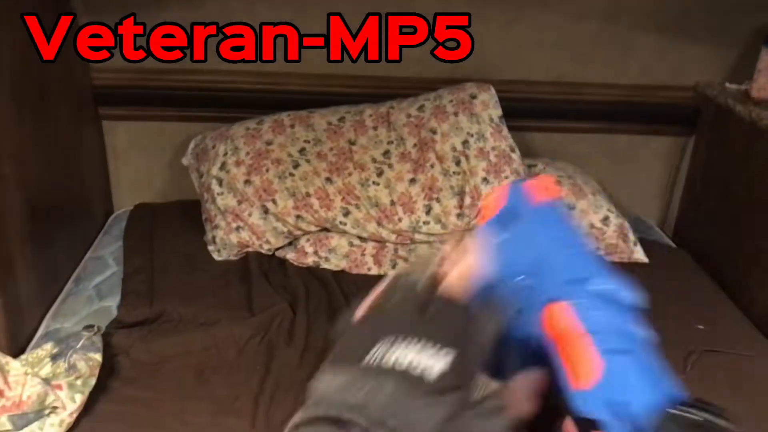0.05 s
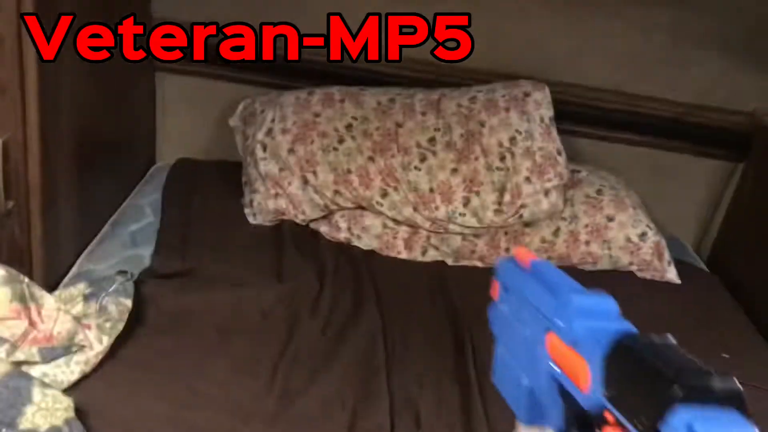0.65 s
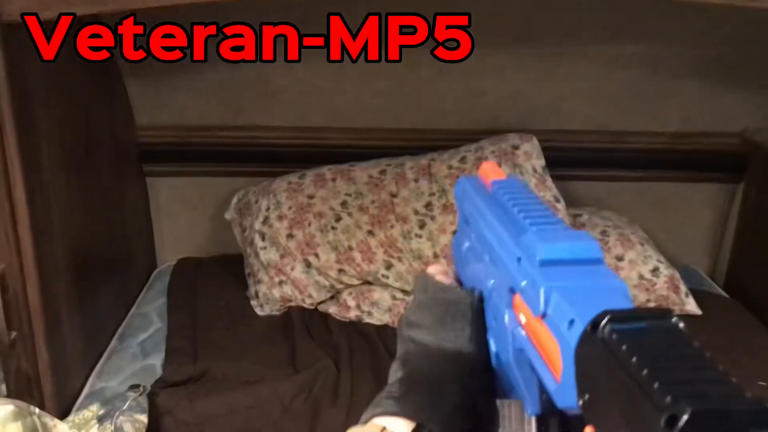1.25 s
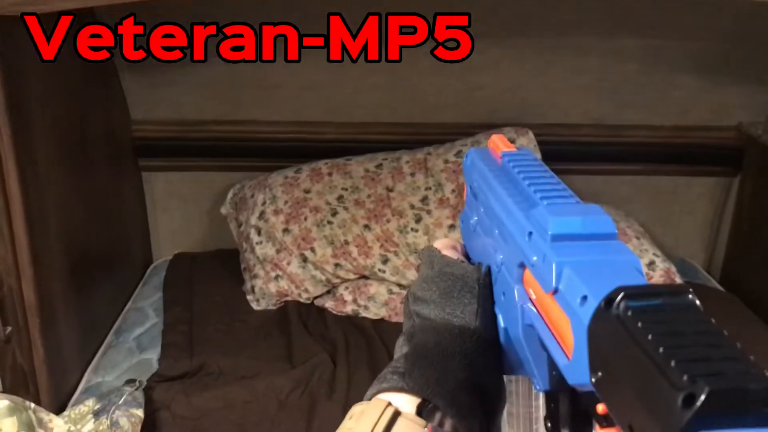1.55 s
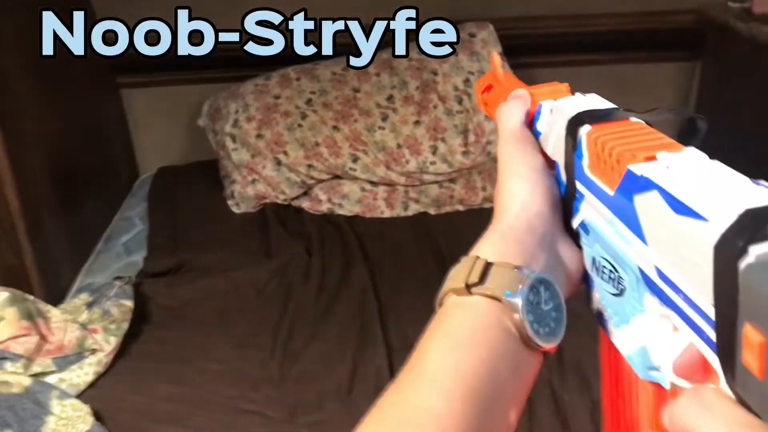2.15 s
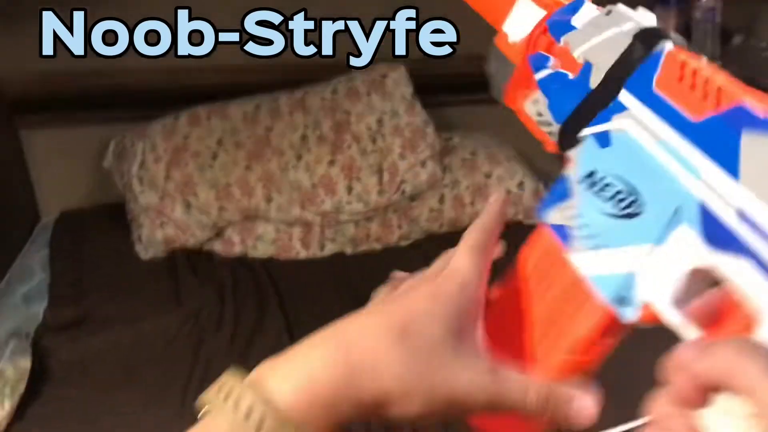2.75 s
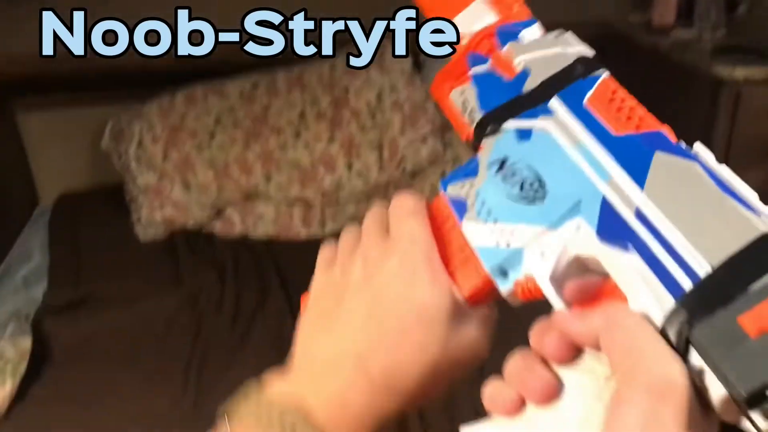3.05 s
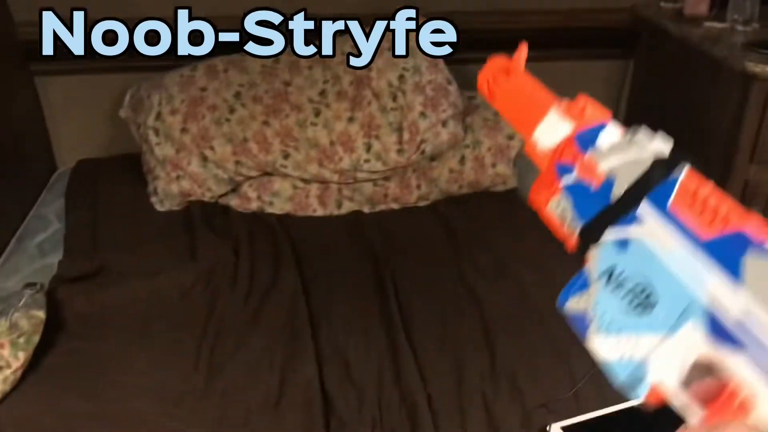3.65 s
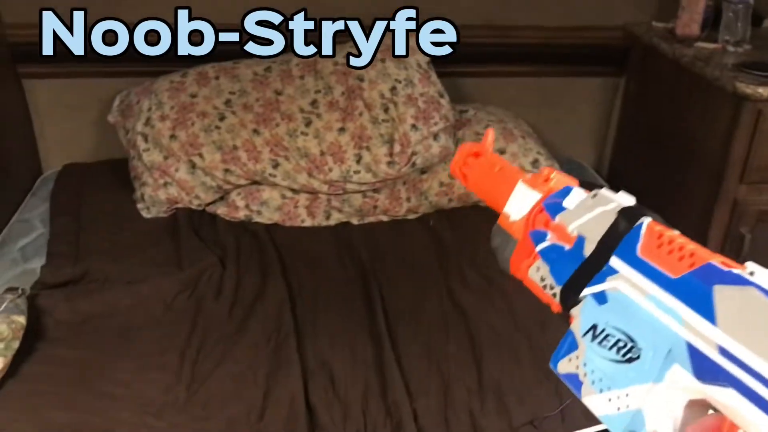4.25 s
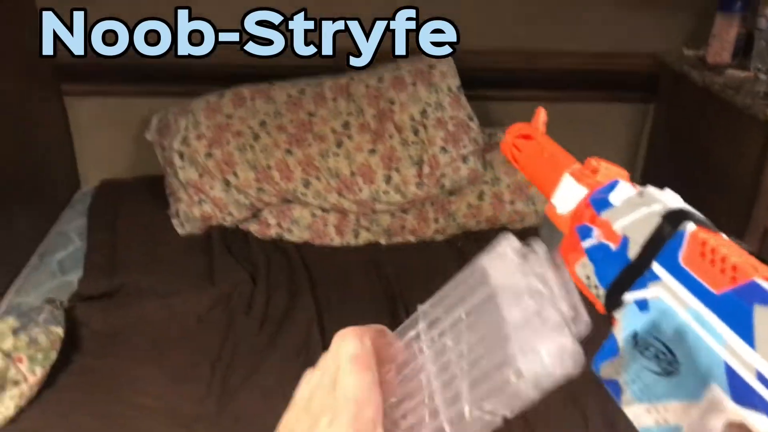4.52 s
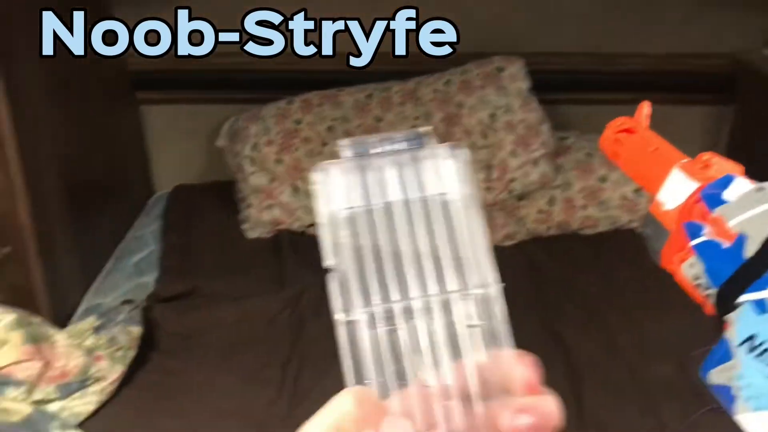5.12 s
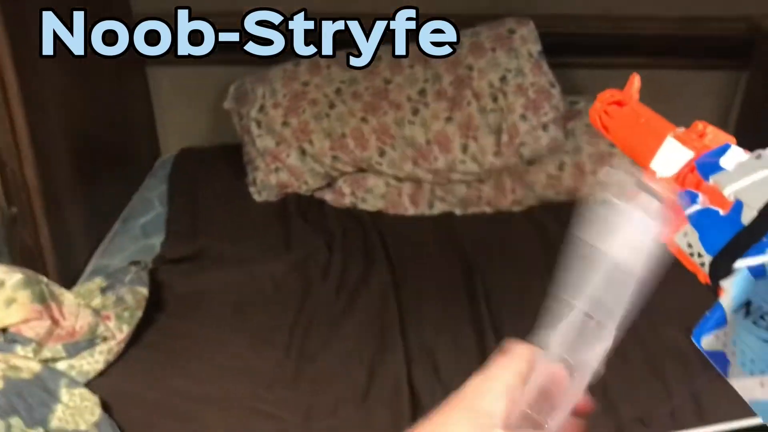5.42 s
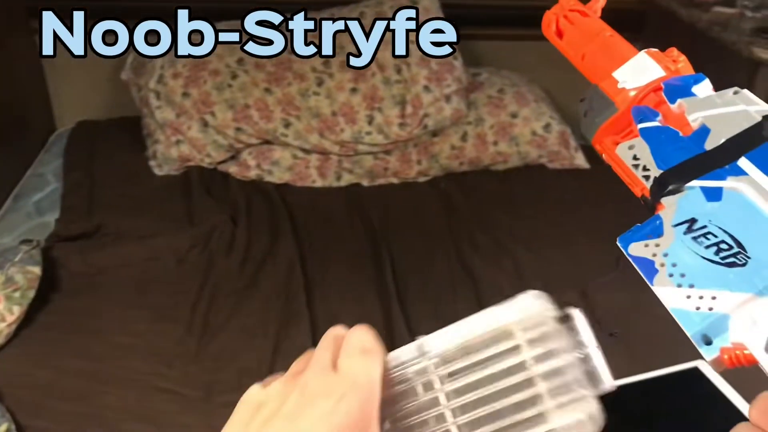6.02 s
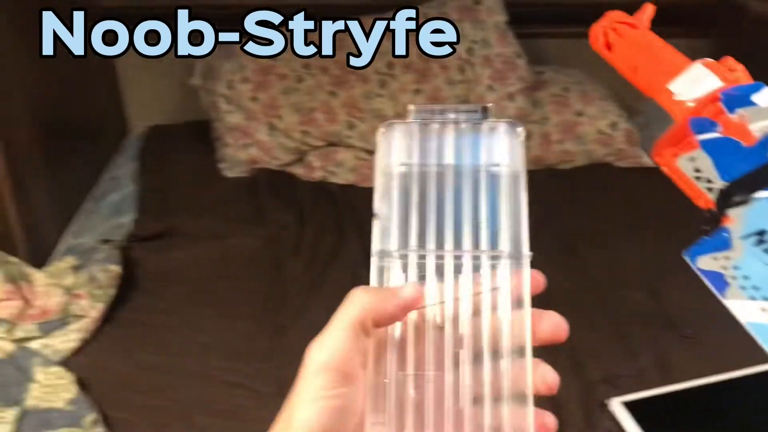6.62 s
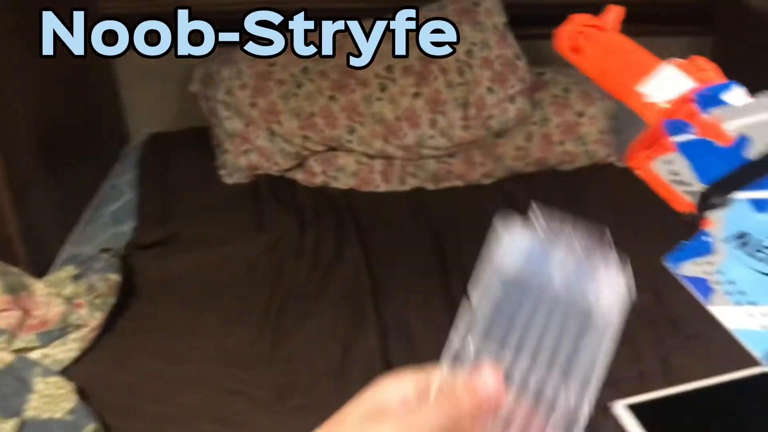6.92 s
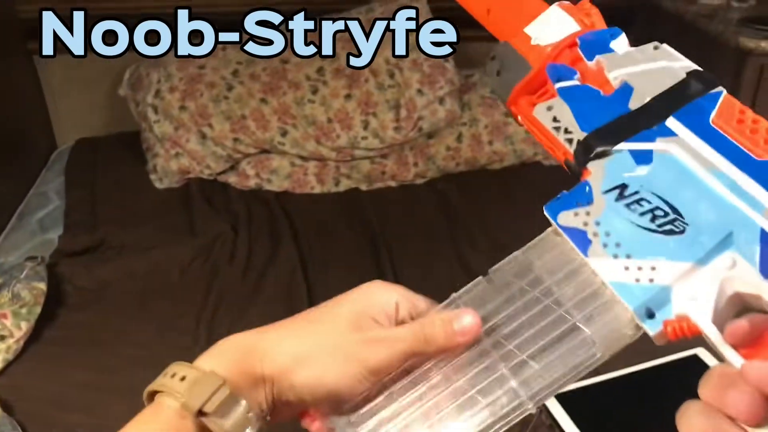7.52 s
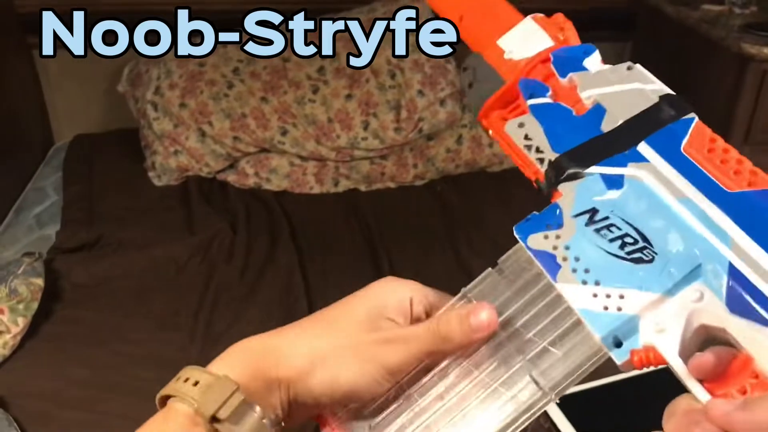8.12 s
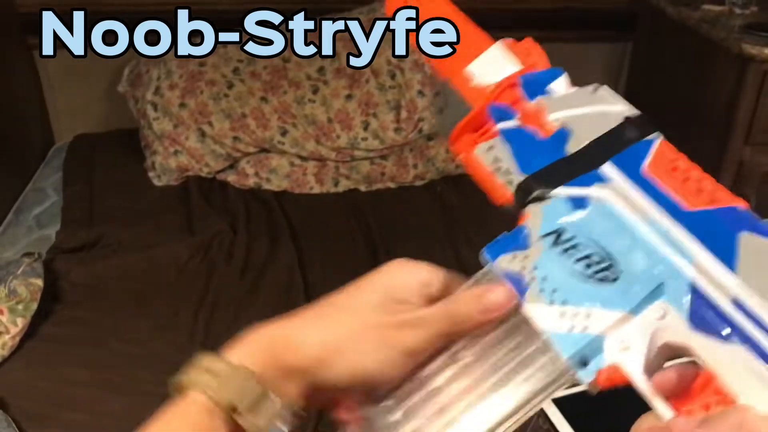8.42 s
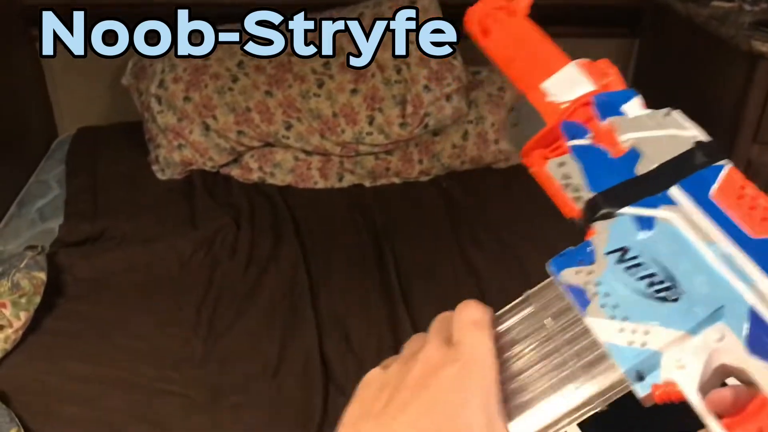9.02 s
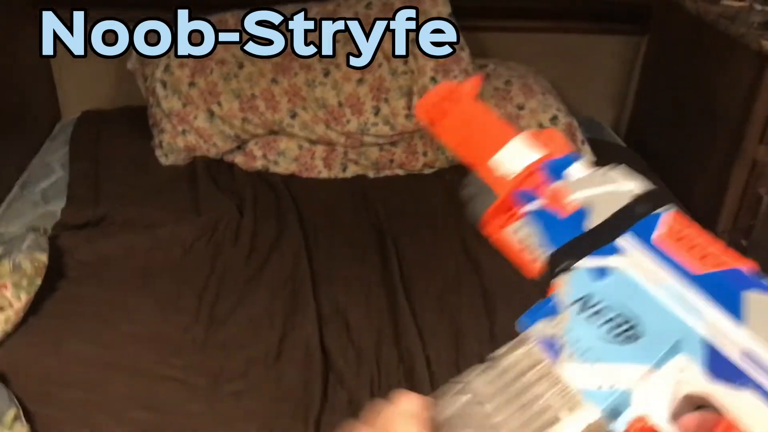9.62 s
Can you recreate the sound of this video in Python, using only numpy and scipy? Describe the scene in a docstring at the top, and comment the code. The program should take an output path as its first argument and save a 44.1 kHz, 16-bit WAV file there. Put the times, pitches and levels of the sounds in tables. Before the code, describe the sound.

A low fan hum runs throughout in a small bedroom, with all the handling close by. A sleeve swishes over plastic during the first second, and a toy blaster's latch snaps sharply at about 0.3 seconds. A few faint ticks follow, then a lull. From 2.5 seconds hands rub and tap the hollow shell, and a magazine is pulled out with clacks at 3.1 and 3.3 seconds. At 3.6 seconds its spring jolts home with a loud snap and a short buzz, settling in faint tinkles until 4.5 seconds. Another magazine is turned over with soft taps, rattles and rubbing. From 7.1 to 8.4 seconds it knocks against the blaster in a run of hard, hollow clacks with scraping between them. One more click comes at 9 seconds, and a last cluster of clacks and rubbing around 9.6 seconds pushes it home.

```python
"""Plastic toy blasters are reloaded close by in a small bedroom, over the low hum of a fan.
A sleeve swishes, a latch snaps and loose parts tick; hands rub on the shells between the impacts.
After three seconds a magazine is pulled out, and its spring jolts home, buzzes and settles in tinkles.
Another is turned over with light taps and, from seven seconds, knocked against the well and pushed home.
Each impact rings the resonances of hollow plastic; friction excites them as a train of tiny slips."""
import sys
import numpy as np
from scipy import signal
from scipy.fft import rfft, irfft, next_fast_len
from scipy.io import wavfile
from scipy.ndimage import uniform_filter1d

SR = 44100
rng = np.random.default_rng(int(sys.argv[2]) if len(sys.argv) > 2 else 0)


def int16_out(signal):
    """Quantize to a 16-bit WAV file."""
    q = np.round(np.clip(np.atleast_2d(signal).T, -1, 1) * 32767)
    wavfile.write(sys.argv[1], SR, q.astype(np.int16))


N = 430857

# resonances of the blaster's hollow shell: pitch_hz, width_hz, lift_db
SHELL_MODES = [(340, 21, 1), (508, 27, 6.5), (634.4, 50, 6.5), (815, 94, 7.5), (899, 41, 5),
               (1074, 50, 7.5), (1265, 90, 5), (1393, 140, 5.5), (1828, 53, 5.5), (2010, 41, 4),
               (2445, 65, 4), (2595, 63, 4), (3450, 250, 2), (4100, 310, 5), (4580, 97, 4),
               (5460, 180, 6.5), (6020, 150, 4), (6730, 77, 4.5), (8850, 300, 1.5)]


def amp(db):
    return 10 ** (np.asarray(db) / 20)


def unit(x):
    return x / np.sqrt(np.mean(x ** 2) + 1e-20)


def along(points, hz):
    """Interpolation of (frequency_hz, value) points on a logarithmic frequency axis."""
    f, v = np.transpose(points)
    return np.interp(np.log(hz + 1), np.log(f + 1), v)


def body(spectrum, modes=(), size=2048):
    """Minimum-phase impulse response of a broad spectrum with resonance peaks on it."""
    hz = np.fft.rfftfreq(size, 1 / SR)
    peaks_db = sum(lift / (1 + (2 * (hz - f) / width) ** 2) for f, width, lift in modes)
    cepstrum = irfft(np.log(amp(along(spectrum, hz) + peaks_db)))
    cepstrum[1:size // 2] *= 2
    cepstrum[size // 2 + 1:] = 0
    return irfft(np.exp(rfft(cepstrum)))


def through(x, response):
    """Convolution: the output of a linear system driven by x."""
    return signal.fftconvolve(x, response)[:len(x)]


def filtered(x, gain):
    """Zero-phase filtering by a gain that depends on frequency."""
    size = next_fast_len(N + SR // 4)
    return irfft(rfft(x, size) * gain(np.fft.rfftfreq(size, 1 / SR)), size)[:N]


def grains(per_s, spread_db, smooth):
    """Shot noise: tiny slips of random time and size, on a smooth hiss."""
    impulses = (rng.random(N) < per_s / SR) * rng.choice([-1, 1], N)
    sizes = amp(spread_db * rng.standard_normal(N).clip(-2, 2))
    return unit(impulses * sizes) + smooth * rng.standard_normal(N)


def strokes(table, rise_share=0.45, end_drop_db=18.5):
    """Friction noise follows sliding speed: each stroke's gain swells and fades; overlaps add in power."""
    t, power = np.arange(N) / SR, np.zeros(N)
    for peak_s, db, length_s in table:
        near = np.abs(t - peak_s) < 2 * length_s
        offset_s = t[near] - peak_s
        away = np.maximum(-offset_s / rise_share, offset_s / (1 - rise_share)) / length_s
        power[near] += amp(db - end_drop_db * away ** 2) ** 2
    return np.sqrt(power)


def room_tail():
    """Reverberation: the bedroom's diffuse field builds up, then decays at a rate set by frequency."""
    # decay times of the room: frequency_hz, t60_s
    decay_times = [(150, .3), (600, 0.21), (2000, 0.17), (6000, 0.23), (15000, 0.19)]
    hz, t, noise = signal.stft(rng.standard_normal(SR // 4), SR, nperseg=256)
    decay = amp(-60 * t / along(decay_times, hz)[:, None])
    build_up = np.clip(t / 0.01, 0, 1)
    tail = signal.istft(noise * decay * build_up, SR, nperseg=256)[1]
    return tail / np.linalg.norm(tail)


def impacts(hits, modes, gains_db, ring_t60_s, crack_t60_s, chatter_db, room_db, uneven, detune):
    """Impact excitation: a short crack, then the damped ring of thin walls, in four bands."""
    # spectra of the bands, from hollow knock to edge snap: frequency_hz, density_db
    knock = [(60, -43), (150, -18), (255, -16), (335, -1.5), (480, -3), (590, -6.5), (720, -18.5),
             (1500, -46.5)]
    wall = [(300, -35.5), (500, -18.5), (700, -1.5), (1200, -2.5), (1500, -1), (1900, -7), (3000, -29.5),
            (6000, -63.5)]
    click = [(900, -43), (1500, -14.5), (2000, 0), (3000, 1), (4500, -0.5), (5800, -7), (8000, -20.5),
             (14000, -51.5)]
    snap = [(3000, -31), (5000, -3.5), (6200, 2), (7600, -2), (8600, 0), (10500, -5), (12500, 0.5),
            (16000, -11)]
    bands = (knock, wall, click, snap)
    rises_s = [0.0012, 0.00098, 0.00013, 0.0002]  # the hollow body takes a moment to move
    out, t = np.zeros(N + SR), np.arange(SR // 4) / SR
    hz, width, lift = np.transpose(modes)
    for start_s, db, knock_db, bright_db, crack_db in hits:
        # a bright contact lands on an edge, a dull one on a flat wall
        levels_db = db + np.array([knock_db, -bright_db, 0, bright_db]) + gains_db
        cracks = amp(crack_db) * np.array([0, 0.4, 1, 1.2])  # strongest in the stiff edges
        # each spot favours other resonances, and the grip shifts them
        shift, favour = rng.uniform(-1, 1, (2, len(hz)))
        struck = np.transpose([hz * (1 + detune * shift), width, lift * (1 + uneven * favour)])
        # the surfaces chatter in tiny spikes while they settle
        roughness = unit(uniform_filter1d(rng.standard_normal(len(t)), size=30))
        chatter = amp(chatter_db * roughness * np.exp(-t / 0.023))
        hit = np.zeros(len(t))
        for band, band_db, t60_s, crack, rise_s in zip(bands, levels_db, ring_t60_s, cracks, rises_s):
            decay = amp(-60 * t / t60_s) + crack * amp(-60 * t / crack_t60_s)
            drive = decay * (1 - np.exp(-t / rise_s)) * chatter * rng.standard_normal(len(t))
            hit += amp(band_db) * unit(through(drive, body(band, struck)))
        out[round(start_s * SR):][:len(t)] += hit + amp(room_db) * through(hit, room_tail())
    return out[:N]


def room_tone():
    """Broadband rumble under a fan's hum, whose lines waver because they are narrow bands of noise."""
    # spectrum of the rumble: frequency_hz, density_db
    rumble_spectrum = [(12, -41), (20, -20.5), (63, -1), (134, -5), (168, -6.5), (193, -11), (337, -16),
                       (527, -25.5), (590, -22), (897, -25.5), (1000, -25.5), (1440, -30), (1710, -32),
                       (2080, -32), (16000, -56.5)]
    # the fan's spectral lines: pitch_hz, width_hz, level_db
    fan_lines = [(61, 4.3, -67.5), (170, 8.3, -57), (282, 8, -75), (790, 52, -74), (1690, 60, -69.5)]
    # gain of rumble and hum, steady but for one brief dip: time_s, gain_db
    gain_curve = [(1.649, -7), (1.652, -21), (1.663, -24), (1.667, -7.5)]

    def fan_gain(hz):
        return sum(amp(db) * np.sqrt(SR / width) / (1 + (2 * (hz - f) / width) ** 2)
                   for f, width, db in fan_lines)

    rumble = unit(filtered(rng.standard_normal(N), lambda hz: amp(along(rumble_spectrum, hz))))
    hum = filtered(rng.standard_normal(N), fan_gain)
    gain = amp(np.interp(np.arange(N) / SR, *np.transpose(gain_curve)))
    return gain * (amp(-46.5) * rumble + hum)


def sleeve_swishes():
    """Sliding friction: cloth slips over the blaster so densely that the slips merge into a swish."""
    # strokes of the sleeve: peak_s, level_db, length_s
    swishes = [(0.01, -48, 0.24), (0.125, -51.5, 0.14), (0.325, -47, 0.35), (0.5, -55, 0.68),
               (0.625, -62.5, 0.13), (0.955, -55.5, 0.095), (1.02, -52.5, .22)]
    # spectrum of sliding cloth: frequency_hz, density_db
    cloth_spectrum = [(240, -52.5), (400, -15.5), (460, -13), (676, -19), (789, 6), (921, -13.5), (1290, 1),
                      (1730, -7), (4650, -5), (16000, -15)]
    slips = grains(per_s=1900, spread_db=6, smooth=1.4)
    return strokes(swishes) * unit(through(slips, body(cloth_spectrum)))


def clacks():
    """Inelastic collision: magazine and latch graze, strike and rebound, ringing the blaster's shell."""
    # hard blows; knock is relative to the level, crack to the ring; a gap of 0 means no such contact:
    # start_s, level_db, knock_db, brightness_db, crack_db, graze_gap_s, rebound_gap_s
    blows = [(0.309, -26.5, -9.5, -0.5, -5, .004, 0.0031), (0.3184, -19, -17.5, 2, -6, 0.00088, .0075),
             (0.332, -23.5, -16, .5, 5, 0.0042, 0), (3.0752, -24, -11, 6.5, 10, 0.0017, 0),
             (3.1054, -39.5, -7, -5, 14, 0.0021, 0), (3.271, -23.5, -6.5, 1.5, 3.5, 0.00014, 0.0054),
             (3.5748, -20, -12, 4, 0.5, 0.0016, 0.011), (7.143, -24.5, -1.5, -1.5, 7.5, 0.00049, 0),
             (7.155, -21, -4.5, 2, -8, 0.00011, 0.0087), (7.3323, -21.5, -8.5, 1.5, 18, 0.00031, 0.0007),
             (7.672, -34, -1.5, -1, -7, 0, 0.0019), (7.7138, -26.5, -11, -2.5, 20, 0.0049, 0.0088),
             (7.7862, -30.5, -11, -5, 11, 0.009, 0.00059), (7.7924, -23.5, -14.5, -0.5, 10.5, 0, 0.00036),
             (7.9624, -25.5, -8, -.5, 8, .009, .019), (8.2472, -22.5, -3, 0.5, -7, 0.004, 0.00049),
             (8.2872, -22, -6.5, 0.5, 2.5, .005, 0), (8.409, -36.5, -0.5, 5.5, 9, 0.00012, 0),
             (8.4225, -31.5, -0.5, 0, -1, 0.0017, 0.00079), (9.0214, -30, -3.5, -2.5, -19, 0.0057, 0.016),
             (9.428, -34, -7, -1, -14, 0.0048, 0.0077), (9.451, -33, -5.5, 0, -13, 0.0012, 0.00039),
             (9.579, -29.5, -1, -2.5, 3, 0.00089, 0), (9.5976, -26, -0.5, 1.5, 1, 0.0031, 0.008),
             (9.626, -26.5, -4, 1, -2, 0, .011)]
    graze_loss_db, rebound_loss_db, glancing_crack_db = 9.5, 4.5, -0.5
    hits = []
    for start_s, db, knock_db, bright_db, crack_db, graze_s, rebound_s in blows:
        hits.append((start_s, db, knock_db, bright_db, crack_db))
        if graze_s > 0:
            hits.append((start_s - graze_s, db - graze_loss_db, knock_db, bright_db, glancing_crack_db))
        if rebound_s > 0:
            hits.append((start_s + rebound_s, db - rebound_loss_db, knock_db, bright_db,
                         glancing_crack_db))
    return impacts(hits, SHELL_MODES, gains_db=[-9, -11, -11.5, -14],
                   ring_t60_s=[0.056, 0.1, 0.11, 0.11], crack_t60_s=0.023,
                   chatter_db=1.5, room_db=-20, uneven=0.51, detune=0.004)


def ticks():
    """Light impacts of fingers and loose parts ring a magazine; a rattle loses energy at each bounce."""
    # taps and rattles: start_s, level_db, brightness_db, contact_count
    taps = [(0.936, -47, 2, 1), (0.9803, -50, 3.5, 1), (1.024, -53.5, 5.5, 1), (1.5809, -62.5, -2.5, 1),
            (2.6603, -43.5, 5, 1), (2.8061, -53.5, -4, 1), (2.8229, -48, 6.5, 1), (2.8548, -54, 5, 2),
            (2.9113, -67, 7.5, 1), (3.011, -43.5, 0, 1), (3.1562, -44, -4.5, 2), (3.268, -43, 9, 1),
            (3.4373, -43, 7.5, 2), (3.7024, -36.5, 8.5, 2), (3.79, -44.5, 4.5, 1), (3.9578, -53.5, 7.5, 1),
            (4.021, -61.5, -6, 1), (4.2339, -53.5, 6.5, 2), (4.496, -52, -2.5, 1), (4.897, -56, -5, 1),
            (4.9305, -63.5, -8.5, 1), (5.008, -63.5, -6.5, 1), (5.2997, -49, 2.5, 1),
            (5.3748, -64, -6.5, 1), (5.6983, -51.5, 2.5, 1), (5.7688, -56, 1, 2), (5.9247, -58, 5, 2),
            (6.2948, -58.5, 2, 2), (6.4437, -49, 7.5, 1), (6.469, -51, 10.5, 3), (6.8078, -50, 7, 3),
            (6.849, -59, -5, 1), (6.8955, -58.5, -2, 2), (7.0188, -58, -5, 2), (7.2917, -50, 2, 1),
            (7.321, -38.5, -4, 2), (7.4492, -44.5, -2, 1), (7.5367, -45, -4, 1), (7.9287, -43.5, -4, 1),
            (7.9392, -38, -4.5, 1), (8.043, -49, 7, 1), (8.379, -39, 2.5, 2), (8.8405, -65.5, -12.5, 1),
            (8.9332, -52.5, -5, 2), (8.975, -47.5, 3, 2), (9.289, -59.5, 3.5, 1), (9.391, -54.5, 1, 2),
            (9.7649, -44, -1, 1)]
    # resonances of a lightly tapped magazine: pitch_hz, width_hz, lift_db
    magazine_modes = [(630, 97, 12.5), (921, 120, 9.5), (1193, 90, 3), (1420, 340, 11.5), (2110, 200, 5),
                      (2810, 110, 3.5), (3750, 320, 5.5), (4343, 180, 4), (5950, 160, 5.5), (6830, 85, 8.5)]
    bounce_gap_s, bounce_loss_db = 0.018, 5
    hits = []
    for start_s, db, bright_db, count in taps:
        knock_db = -bright_db / 2  # the duller the tap, the more knock
        crack_db = -4.5 if count > 1 else 8.5  # a rattle is soft, a lone tap crisp
        for k in range(count):
            hits.append((start_s + k * bounce_gap_s, db - k * bounce_loss_db,
                         knock_db, bright_db, crack_db))
    return impacts(hits, magazine_modes, gains_db=[-18.5, -11.5, -12.5, -18],
                   ring_t60_s=[0.096, 0.099, 0.099, 0.086], crack_t60_s=0.025,
                   chatter_db=3.5, room_db=-15.5, uneven=0.61, detune=0.017)


def rubbing(spots=3, slip_t60_s=0.043):
    """Stick-slip friction: skin or magazine catches at several spots; each slip rings the shell."""
    # strokes of hand or magazine on plastic: peak_s, level_db, length_s
    rubs = [(2.53, -65, 0.19), (2.86, -60, 0.37), (3.125, -45.5, 0.13), (3.29, -44.5, 0.12),
            (3.45, -63, 0.54), (4.05, -62, .45), (5.2, -77, 0.95), (5.87, -67.5, 0.64), (6.48, -58, 0.47),
            (6.86, -66.5, 0.58), (7.22, -48.5, .26), (7.58, -50.5, 0.17), (7.78, -44.5, 0.25),
            (8.16, -61, 0.3), (8.41, -44.5, 0.22), (8.6, -63.5, .4), (9.06, -56, 0.35), (9.34, -67.5, 0.13),
            (9.49, -54, 0.24), (9.63, -41, 0.22)]
    # spectrum of rubbed plastic: frequency_hz, density_db
    plastic_spectrum = [(200, -29.5), (550, 4), (1400, -1.5), (2300, 0), (4500, -3), (7000, -6),
                        (10000, -11.5), (13000, -11.5), (16000, -9)]
    decay = amp(-60 * np.arange(SR // 10) / SR / slip_t60_s)
    friction = np.zeros(N)
    for _ in range(spots):
        slips = grains(per_s=25, spread_db=5, smooth=0.37)
        friction += through(slips, rng.standard_normal(len(decay)) * decay)
    return amp(3.5) * strokes(rubs) * unit(through(friction, body(plastic_spectrum, SHELL_MODES)))


def spring_jolts(attack_s=0.011, fade_db_per_s=148.5):
    """Damped free vibration: each jolt of the freed magazine's spring rings the case and starts a buzz."""
    # jolts of the spring: start_s, ring_db, buzz_db
    jolts = [(3.578, -23, -28), (3.705, -45, -34.5), (3.79, -42, -42)]
    # broad spectrum of the buzz: frequency_hz, density_db
    buzz_spectrum = [(200, -30.5), (500, -5.5), (1200, -2), (3000, -1.5), (6000, -3.5), (10000, -6.5),
                     (13000, -2), (16000, -9.5)]
    # resonances of the spring: pitch_hz, width_hz, lift_db
    spring_modes = [(745, 47, 15.5), (1520, 100, 7.5), (2713, 100, 6.5), (3894, 150, 2.5), (4370, 150, 9),
                    (6300, 200, 4.5), (7160, 200, 4)]
    # modes of the magazine's case: pitch_hz, level_db, t60_s
    case_modes = [(460, -5.5, 0.092), (678, 1.5, 0.16), (730, -14.5, .12), (1524, -6.5, .14),
                  (2720, -16, .2)]
    impulses, shiver, t = np.zeros(N), np.zeros(N), np.arange(SR // 3) / SR
    for start_s, ring_db, buzz_db in jolts:
        impulses[round(start_s * SR)] = amp(ring_db)
        age_s = np.clip(np.arange(N) / SR - start_s, 0, 2)
        envelope = amp(buzz_db - fade_db_per_s * age_s) * (1 - np.exp(-age_s / attack_s))
        shiver = np.hypot(shiver, envelope)
    chatter = grains(per_s=750, spread_db=6, smooth=1)
    buzz = shiver * unit(through(chatter, body(buzz_spectrum, spring_modes)))
    ring = sum(amp(db - 60 * t / t60) * np.sin(2 * np.pi * hz * t) for hz, db, t60 in case_modes)
    return buzz + through(impulses, ring)


def tinkles(t60_s=0.07):
    """Resonance: the settling spring's coils touch now and then, and each touch rings faintly."""
    # touches of the coils: start_s, peak_db
    touches = [(4.0877, -49), (4.135, -52), (4.2346, -46), (4.2986, -46), (4.3462, -45.5), (4.4328, -54.5),
               (4.4574, -53), (4.496, -41.5)]
    # broad spectrum of a touch: frequency_hz, density_db
    touch_spectrum = [(300, -18), (1000, -5), (4500, -2), (7000, -11), (16000, -18)]
    # resonances of the coils: pitch_hz, width_hz, lift_db
    coil_modes = [(1405, 220, 17), (3720, 350, 13), (4370, 300, 12.5), (6000, 310, 12)]
    out, t = np.zeros(N), np.arange(SR // 5) / SR
    for start_s, peak_db in touches:
        burst = rng.standard_normal(len(t)) * amp(-60 * t / t60_s)
        tinkle = through(burst, body(touch_spectrum, coil_modes))
        out[round(start_s * SR):][:len(t)] += amp(peak_db) * tinkle / np.abs(tinkle).max()
    return out


def scene():
    """Superposition: room tone, microphone hiss and all the handling add in one channel."""
    hiss = amp(-81.5) * rng.standard_normal(N)
    handling = sleeve_swishes() + clacks() + ticks() + rubbing() + spring_jolts() + tinkles()
    return (room_tone() + hiss + handling)[None]


def record(dry):
    """Soft saturation rounds off the tallest peaks, and a steep low-pass limits the band."""
    ceiling, cutoff_hz = 0.8, 16000
    rounded = dry[0] / (1 + np.abs(dry[0] / ceiling) ** 4) ** (1 / 4)
    return filtered(rounded, lambda hz: 1 / (1 + (hz / cutoff_hz) ** 130))[None]


dry = scene()
out = record(dry)
int16_out(out)
```